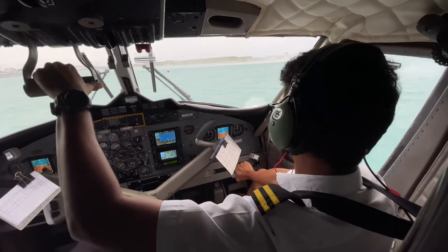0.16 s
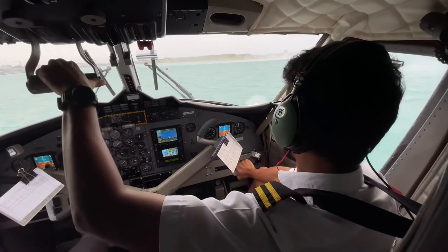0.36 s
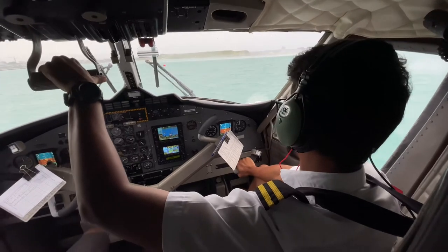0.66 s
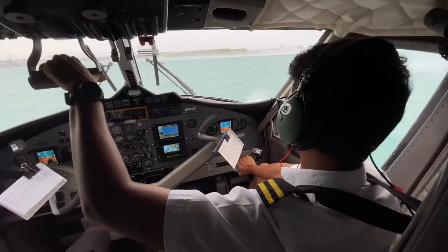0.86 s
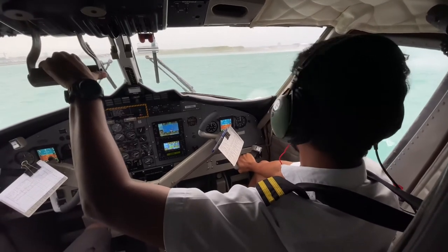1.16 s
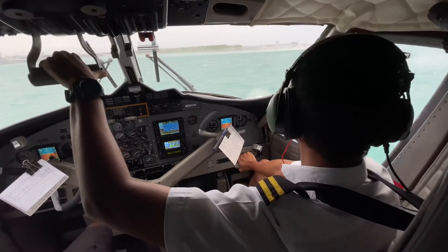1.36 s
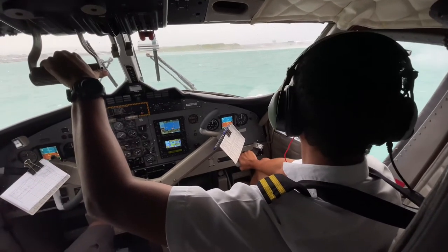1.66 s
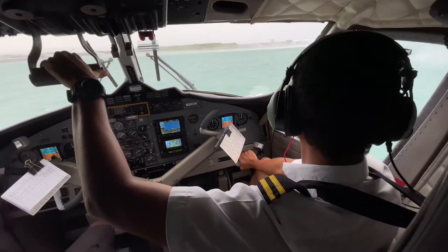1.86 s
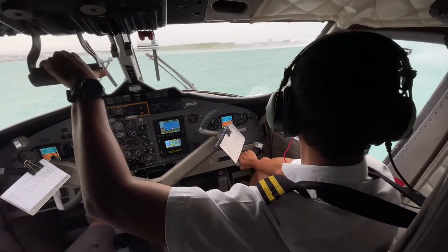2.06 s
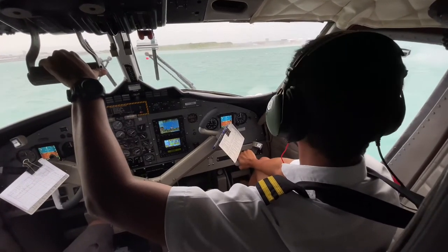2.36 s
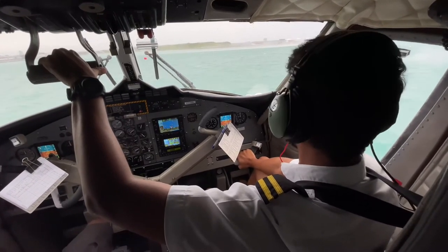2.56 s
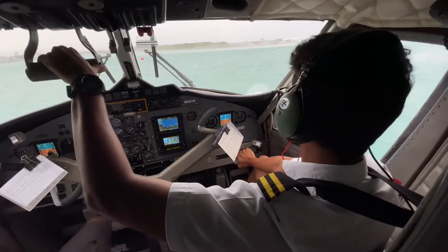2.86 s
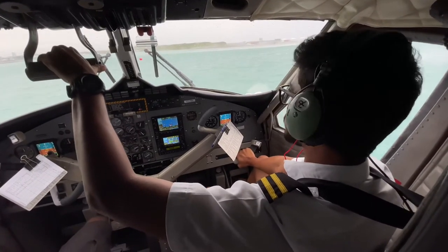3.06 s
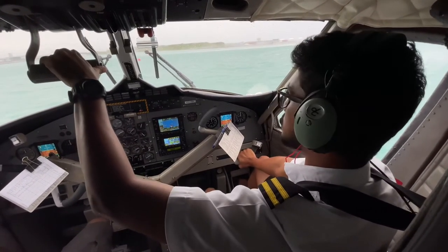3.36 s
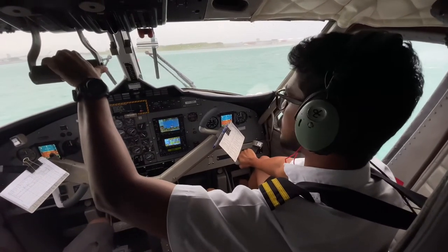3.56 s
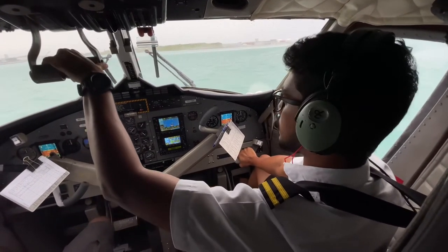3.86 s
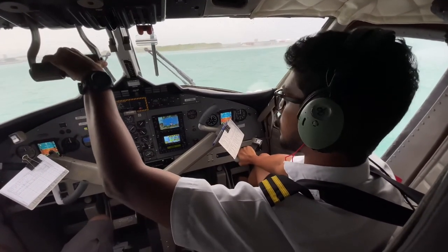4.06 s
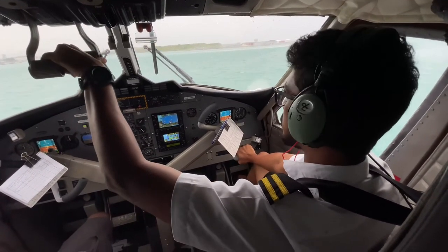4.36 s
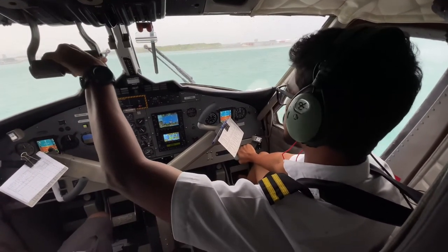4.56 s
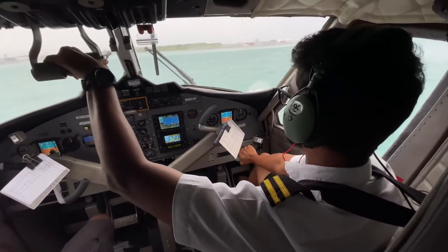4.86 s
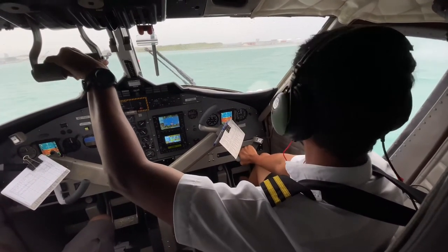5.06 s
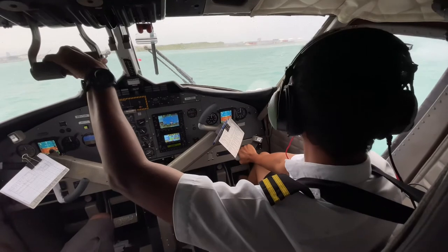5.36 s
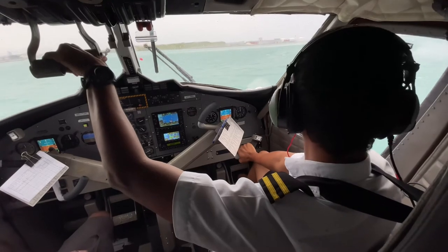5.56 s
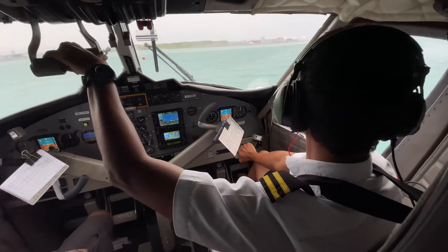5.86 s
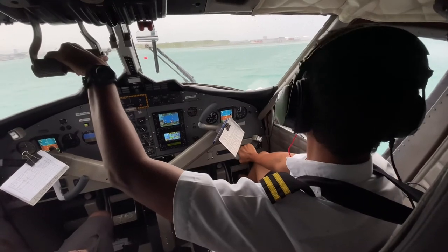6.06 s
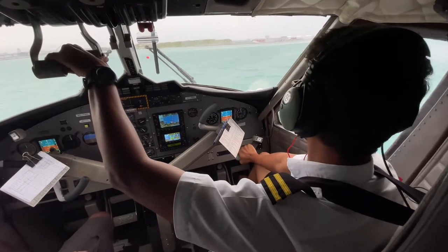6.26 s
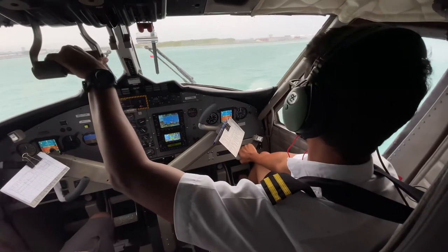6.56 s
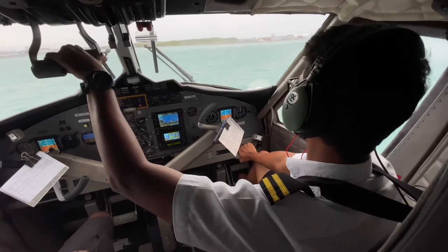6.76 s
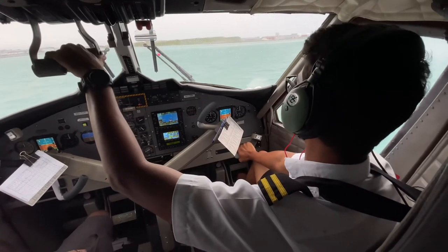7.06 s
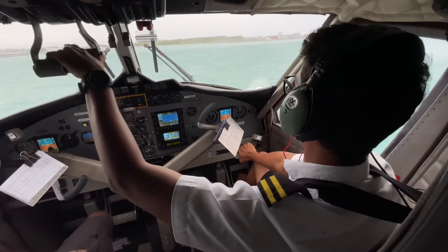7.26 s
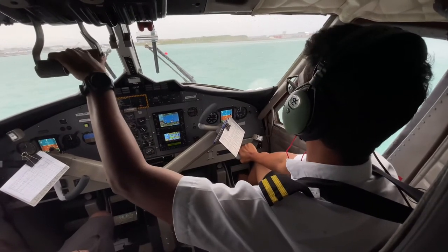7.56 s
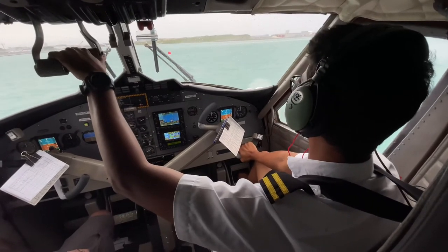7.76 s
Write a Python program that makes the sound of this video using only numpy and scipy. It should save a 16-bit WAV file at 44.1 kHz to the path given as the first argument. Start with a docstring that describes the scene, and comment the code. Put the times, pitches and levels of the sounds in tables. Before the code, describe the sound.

Continuous loud engine noise heard from inside a small seaplane cabin. The nearer propeller dips slightly, speeds up into a rougher, buzzing roar by the middle, then slowly relaxes; the farther one slows, then speeds up late. Thin, piercing compressor whines cross in pitch above airy hiss. Cabin resonance booms in uneven pulses over the steady rumble. The stereo microphone sits in the enclosed cockpit.

```python
"""Two propellers drone and beat in the cockpit of a twin turboprop seaplane taxiing on opposed throttles.
Each is a blade tone, its octave and bursting overtones; a band of the drone booms on its own level curve.
Two compressor whines follow the turbine speeds through a level path, hoarser when fast.
Filtered noise makes hull rumble, wash that grows with thrust and intake hiss that grows with turbine speed.
Faint steady whistles lie behind."""
import sys
import numpy as np
from scipy import signal
from scipy.fft import rfft, irfft, next_fast_len
from scipy.io import wavfile
from scipy.ndimage import uniform_filter1d, map_coordinates

SR = 44100
rng = np.random.default_rng(int(sys.argv[2]) if len(sys.argv) > 2 else 0)


def wav_record(signal):
    """Record a signal, one row per channel, as 16-bit PCM in the file named by sys.argv[1]."""
    frames = np.transpose(np.atleast_2d(signal))
    bounded = np.clip(frames, -1, 1)
    # unit amplitude maps onto the largest positive 16-bit level
    quanta = np.round(bounded * 32767).astype(np.int16)
    wavfile.write(sys.argv[1], SR, quanta)


N = 348831

# nearer propeller, lagging behind its turbine: t/s, blade rate f/Hz, blade tone level/dB, octave level/dB
NEAR_BLADES = [(0, 55.63, -21, -35), (.2, 54.46, -19, -24), (.35, 54.4, -30.5, -36),
               (1.2, 51.97, -26.5, -31), (1.7, 51.66, -34, -28), (2.3, 55.22, -21, -29.5),
               (2.6, 57.93, -24, -29), (2.69, 59.2, -20, -20.5), (2.83, 61.6, -22, -25),
               (3.05, 63.12, -20, -16), (3.25, 67.04, -24.5, -34.5), (3.7, 74.05, -17, -24),
               (4, 76.26, -26.5, -30.5), (4.4, 76.65, -28, -33), (5.4, 75.05, -32, -33),
               (6.4, 73.4, -60, -32), (6.85, 72.6, -31, -33), (7.91, 70.21, -24, -43)]
# compressor speed of the nearer engine: t/s, blade tone f/Hz
NEAR_COMPRESSOR = [(0, 5700), (1, 6260), (2, 7035), (3.1, 8180), (3.5, 8600), (3.8, 8580), (4.4, 7990),
                   (5, 7390), (5.6, 7260), (6.4, 7140), (7.5, 6525), (7.91, 6336)]
# compressor speed of the farther engine: t/s, blade tone f/Hz
FAR_COMPRESSOR = [(0, 6475), (.5, 6180), (1.5, 5846), (1.8, 5774), (2.1, 5716), (2.45, 5762), (3.5, 6046),
                  (4, 6480), (5, 7350), (5.85, 8079), (7.91, 8070)]
# pull of the propellers: t/s, thrust above taxi power/dB
PULL = [(0, -4.5), (.6, -6), (2, -2.5), (2.7, -4), (3.55, 3.5), (4.5, 1.5), (5.6, 0.5), (7, -2), (7.91, -5)]


def amp(db):
    """Decibels to gain."""
    return 10 ** (np.asarray(db) / 20)


def unit(x):
    """Scale to rms 1."""
    return x / np.sqrt(np.mean(x ** 2) + 1e-20)


def along(points, hz):
    """Read (f/Hz, value) points on a log frequency axis."""
    f, v = np.transpose(points)
    return np.interp(np.log(hz + 1), np.log(f + 1), v)


def curves(rows):
    """One value per sample for each column after the time."""
    s, *cols = np.transpose(rows)
    t_s = np.arange(N) / SR
    return [np.interp(t_s, s, c) for c in cols]


def wobble(rate_hz):
    """Smooth random curve through rate_hz normal knots a second."""
    at = np.arange(0, N + 16, 16)  # every 16th sample, joined by lines
    knots = rng.standard_normal(16384)
    return np.interp(np.arange(N), at, map_coordinates(knots, [at * rate_hz / SR], mode="wrap"))


def filtered(x, response):
    """x times a response of frequency."""
    m = next_fast_len(N + 8192)
    return irfft(rfft(x, m) * response(np.fft.rfftfreq(m, 1 / SR)), m)[..., :N]


def angle(hz):
    """Running phase/rad of a changing frequency."""
    return 2 * np.pi * np.cumsum(hz) / SR


def cabin(hz):
    """Gain of the cabin air and panel modes, summed in dB."""
    # resonances: centre f/Hz, width/Hz, lift/dB
    modes = [(100.3, 1.6, 7.5), (208, 49, -3.5), (246.7, 7.7, 5), (306.2, 9.08, 4.5), (384, 156, -3.5),
             (441.7, 8.2, 8), (545, 19, 3.5), (695, 17, 2), (894, 116, 3.5), (1140, 16, 3), (1208, 36, 6),
             (1648, 34, 6.5), (1875, 71, 6.5), (2090, 41, 3.5), (2330, 49, 5), (3320, 130, 2.5),
             (3770, 26, 0), (6840, 100, 5.5), (6880, 80, -1), (11270, 480, 3.5)]
    return amp(sum(db / (1 + (2 * (hz - centre) / width) ** 2) for centre, width, db in modes))


def ports(hz):
    """Left and right gain at these frequencies, constant in total power."""
    # stereo balance: f/Hz, left over right/dB
    balance = [(60, 0), (150, 1.5), (300, 2), (850, 5), (1400, 1), (2400, -2), (3300, 7.5), (4200, 12),
               (5200, 6), (6800, 10), (8000, 1), (9300, 0)]
    lean = amp(along(balance, hz))
    return np.array([lean, np.ones_like(lean)]) * np.sqrt(2 / (1 + lean ** 2))


def whistles():
    """Faint whistles, likely fans and gyros: fixed tones wavering in level and phase."""
    # tones: f/Hz, peak level/dB
    tones = [(1931, -53), (6760, -60), (11290, -57)]
    total = 0
    for hz, db in tones:
        level = amp(db + 2 * wobble(4))
        total = total + level * np.sin(angle(np.full(N, hz)) + wobble(hz / 400))
    return total


def rush(spectrum):
    """Stereo air noise of rms 1, heard through the cabin, left leading right in phase."""
    # left-right correlation: f/Hz, likeness/1
    likeness = [(60, .85), (250, .8), (400, .62), (1000, .55), (3400, .58), (3700, .15), (7000, .15),
                (9300, .45), (11300, .8)]
    # phase lead of left over right: f/Hz, lead/rad
    lead = [(40, 0), (130, .4), (280, .2), (350, 1), (500, 1.7), (800, 2.1), (1000, 2.9), (1150, 1.5),
            (1400, 3.2), (1950, 3.7), (2350, 6.3), (2550, 6.8), (2700, 8.7), (3400, 9.5), (8600, 12.6),
            (10200, 9.4), (11000, 8.2), (11700, 6.3)]

    def colour(hz):
        turn = np.arccos(np.clip(along(likeness, hz), -1, 1)) / 2
        return amp(along(spectrum, hz)) * cabin(hz) * np.array([np.cos(turn), np.sin(turn)])

    def arrival(hz):
        return ports(hz) * np.exp(1j * along(lead, hz) * np.array([[.5], [-.5]]))

    mid, side = filtered(rng.standard_normal((2, N)), colour)
    return unit(filtered(np.array([mid + side, mid - side]), arrival))


def patchy(x, depth_db):
    """Eddies lift and drop patches of the spectrum for a moment."""
    z = signal.stft(x, nperseg=1024)[2]
    field = rng.standard_normal(z.shape[1:])
    field = uniform_filter1d(field, size=4, axis=0)
    field = uniform_filter1d(field, size=6, axis=1)
    return unit(signal.istft(z * amp(depth_db * unit(field)), nperseg=1024)[1][:, :N])


def power(compressor):
    """Engine power setting: doublings of turbine speed above taxi speed."""
    taxi_hz = 7000
    return np.log2(curves(compressor)[0] / taxi_hz)


def air():
    """Propeller wash roars along the hull and shakes it; intakes hiss louder as the turbines speed up."""
    # hull rumble spectrum: f/Hz, relative density/dB
    rumble_spectrum = [(15, -12), (42, -17), (58, 2), (100, -4), (120, -5), (175, -6), (205, 2), (265, -6),
                       (360, -5), (500, -29), (900, -86)]
    # propeller wash spectrum: f/Hz, relative density/dB
    wash_spectrum = [(200, -29), (340, -2), (490, 1), (820, -2), (1000, -8), (1400, -8.5), (2100, -16.5),
                     (2750, -17.5), (3300, -17), (4200, -23.5), (6500, -25), (12000, -80)]
    # intake hiss spectrum: f/Hz, relative density/dB
    hiss_spectrum = [(1500, -20), (3200, -5), (4300, -6), (5500, -2), (6800, 1), (8000, 1), (9300, 1.5),
                     (10200, -8), (10800, -1), (11300, 3.5), (12400, -5), (13100, -20), (14000, -38),
                     (15000, -50)]
    rumble_db, wash_db, hiss_db = -26, -21, -34  # at taxi power
    rumble_db_per_db, wash_db_per_db, treble_db_per_db = .2, .85, .083  # growth per dB of thrust
    near_db_per_doubling, far_db_per_doubling = 9, 3  # hiss growth with each turbine's speed
    treble_hz, chop_depth = 1090, .15

    thrust_db, = curves(PULL)
    intake_db = near_db_per_doubling * power(NEAR_COMPRESSOR) + far_db_per_doubling * power(FAR_COMPRESSOR)
    chop = 1 + chop_depth * np.sin(angle(curves(NEAR_BLADES)[0]))  # one gust per blade

    rumble_level = amp(rumble_db + rumble_db_per_db * thrust_db + .8 * wobble(6))
    rumble = rumble_level * rush(rumble_spectrum)

    roar = patchy(rush(wash_spectrum), depth_db=2.4)
    treble = filtered(roar, lambda hz: 1 - 1 / (1 + (hz / treble_hz) ** 4))
    roar = roar - treble + amp(treble_db_per_db * thrust_db) * treble
    wash = amp(wash_db + wash_db_per_db * thrust_db + .37 * wobble(10)) * chop * roar

    hiss = amp(hiss_db + intake_db + .64 * wobble(14)) * patchy(rush(hiss_spectrum), depth_db=2.46)
    return rumble + wash + hiss


def wavering(phase, haze, flutter_hz, haze_hz, steady):
    """Stereo tone of rms 1 through turbulent air: steady part plus fading core in a soft-edged haze."""
    def skirt():
        return unit(wobble(haze_hz / 2) + wobble(haze_hz) + .5 * wobble(2 * haze_hz))

    def fade():
        sides = np.array([steady + wobble(flutter_hz) + haze * skirt() for _ in range(2)])
        return sides / np.sqrt(1 + steady ** 2 + haze ** 2)

    return unit(fade() * np.sin(phase) + fade() * np.cos(phase))


def turbine(compressor, path, haze, flutter_hz, haze_hz, unsteady, steady, fade_db, sink_db_per_db):
    """Compressor blade tone and octave, firm when slow and hoarse when fast; may sink with thrust."""
    haze_steepness, haze_db_per_db = 4.5, .17  # power of speed; growth per dB of thrust
    tone_hz, = curves(compressor)
    thrust_db, = curves(PULL)
    phase = angle(tone_hz * (1 + unsteady * wobble(25)))
    hoarse = haze * (tone_hz / np.max(tone_hz)) ** haze_steepness * amp(haze_db_per_db * thrust_db)

    tone = wavering(phase, hoarse, flutter_hz, haze_hz, steady)
    tone = amp(along(path, tone_hz)) * tone * ports(tone_hz)
    # octave: hazier, equal on both sides
    octave = wavering(2 * phase, 2.6 * hoarse, 2 * flutter_hz, 1.6 * haze_hz, steady)[0]
    octave = amp(along(path, 2 * tone_hz) - 5.5) * octave

    swell_db = fade_db * wobble(16) / np.hypot(1, hoarse / 2)
    return amp(swell_db - sink_db_per_db * thrust_db) * (tone + octave)


def boom(drone):
    """Strongest cabin air mode: the drone's band near it, levelled, then swelling on a set curve."""
    # passband of the mode: f/Hz, gain/dB
    band = [(160, -71), (205, 3.5), (240, 2), (300, -61)]
    # boom: t/s, level/dB
    boom_level = [(0.0, -41), (0.04, -28), (0.26, -41), (0.33, -26), (0.42, -51), (1.37, -29.5),
                  (1.68, -45), (1.75, -26), (2.13, -26), (2.16, -36), (2.46, -22), (2.69, -39), (2.97, -24),
                  (3.03, -41), (3.35, -25), (3.45, -48), (3.52, -26), (3.7, -23), (3.87, -37), (3.91, -41),
                  (4.02, -21.5), (4.25, -20.5), (4.37, -45), (4.58, -25), (4.81, -22), (4.87, -36),
                  (5.05, -26.5), (5.51, -21.5), (5.56, -43), (5.63, -25), (5.98, -23.5), (6.05, -36),
                  (6.2, -21), (6.46, -39), (6.53, -21), (6.64, -32.5), (6.84, -14.5), (6.89, -31),
                  (7.0, -17.5), (7.07, -45), (7.45, -36), (7.9, -54)]
    ring = filtered(drone, lambda hz: amp(along(band, hz)))
    ring_power = uniform_filter1d(np.mean(ring ** 2, axis=0), size=SR // 12)
    return amp(curves(boom_level)[0]) * ring / np.sqrt(np.abs(ring_power) + 1e-12)


def bursts():
    """Uneven inflow: a complex gain of rms 1 that swells, drops out and returns out of step."""
    swing_db, rate_hz, slip_rad = 6.44, 15, .45  # swing limit before levelling, knot rate, phase wander
    size = amp(swing_db * np.tanh(wobble(rate_hz)))
    return unit(size) * np.exp(1j * slip_rad * wobble(rate_hz))


def propeller(blades, slap_db, fall_db, speed_db, wander_rad, rough, count):
    """Passing blades thump the hull; faster tips add a slap of overtones fluttering in uneven inflow."""
    slap_db_per_db, octave_waver_db = .56, 2.6  # growth per dB of thrust; random waver
    blade_hz, thump_db, octave_db = curves(blades)
    phase = angle(blade_hz) + wander_rad * wobble(14)  # blades hunt about their governed speed
    apart = np.array([[.5], [-.5]])  # standing waves put left and right out of step

    thump = amp(thump_db + 1.4 * wobble(9)) * np.sin(phase + .82 * apart)
    octave = amp(octave_db + octave_waver_db * wobble(14)) * np.sin(2 * phase + .5 * apart)
    drone = (thump + octave) * ports(blade_hz)

    # overtones grow with thrust and tip speed and swell as they sweep through the cabin modes
    tip_db = speed_db * np.log2(blade_hz / np.max(blade_hz))
    slap = amp(slap_db + slap_db_per_db * curves(PULL)[0] + tip_db)
    grid_hz = np.arange(2000.)
    lift = cabin(grid_hz)
    for k in range(3, count + 1):
        level = slap * amp(-fall_db * np.log2(k)) * np.interp(k * blade_hz, grid_hz, lift)
        scatter = rough * np.sqrt(k)
        jitter = 1 + scatter * (wobble(30) + 1j * wobble(30))
        flutter = bursts() * jitter / np.sqrt(1 + 2 * scatter ** 2)
        tone = level * flutter * np.exp(1j * (k * phase + rng.uniform(0, 2 * np.pi)))
        stereo = np.exp(.22j * k * apart) * ports(k * np.mean(blade_hz, keepdims=True))
        drone += np.imag(tone * stereo)
    return np.sqrt(2) * drone  # peak to rms levels


def scene():
    """Both engines, the air they move and the whistles."""
    # farther propeller: t/s, blade rate f/Hz, blade tone level/dB, octave level/dB
    far_blades = [(0, 70.5, -43, -52), (.7, 66.2, -25, -39), (1.6, 60.3, -28.5, -45), (3.6, 56.6, -33, -27),
                  (4.5, 58.53, -29.5, -59), (5.6, 67.15, -21, -54), (5.9, 71.07, -18.5, -48),
                  (6.4, 73.57, -23, -51), (6.8, 75.87, -19, -31), (7.91, 76.98, -50, -29)]
    # nearer compressor's path to the cockpit; the whine flares over its peaks: f/Hz, level/dB
    near_path = [(5700, -48), (5970, -48), (6050, -43), (6160, -48), (6360, -42), (6520, -44),
                 (6680, -39.5), (6780, -29), (6900, -38.5), (7240, -40.5), (7420, -37), (7560, -33),
                 (7680, -37.5), (8200, -37), (8600, -36), (11500, -47), (12300, -57), (13300, -75),
                 (14500, -57), (15500, -53), (16000, -60)]
    # farther compressor's path to the cockpit: f/Hz, level/dB
    far_path = [(5720, -38), (5748, -39.5), (5772, -42.5), (5784, -53), (5950, -54), (6100, -46),
                (6290, -41.5), (6500, -43), (6850, -40.5), (7300, -45), (8100, -38.5), (11500, -32.5),
                (12100, -39), (12900, -47), (13500, -56), (14600, -50), (15500, -48), (16000, -66)]

    near_whine = turbine(NEAR_COMPRESSOR, near_path, haze=2.1, flutter_hz=65, haze_hz=330,
                         unsteady=.0016, steady=.1, fade_db=2, sink_db_per_db=.6)
    far_whine = turbine(FAR_COMPRESSOR, far_path, haze=2.8, flutter_hz=35, haze_hz=330,
                        unsteady=.0012, steady=1, fade_db=1.3, sink_db_per_db=0)
    # fall_db: per doubling of harmonic number; speed_db: per doubling of blade rate
    near = propeller(NEAR_BLADES, slap_db=-21.5, fall_db=3.4, speed_db=5,
                     wander_rad=.08, rough=.16, count=12)
    far = propeller(far_blades, slap_db=-34, fall_db=5, speed_db=1,
                    wander_rad=.13, rough=.1, count=7)
    drone = near + far
    return whistles() + air() + near_whine + far_whine + boom(drone) + drone


def record(dry):
    """Round the highest peaks, then remove everything above the band limit."""
    top_hz = 15750
    rounded = dry / (1 + np.abs(dry / .9) ** 8) ** (1 / 8)
    return filtered(rounded, lambda hz: hz < top_hz)


dry = scene()
out = record(dry)
wav_record(out)
```